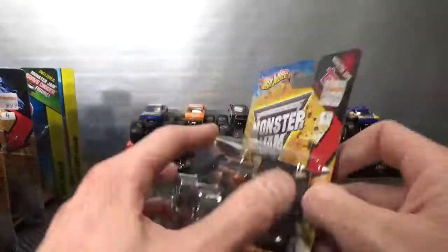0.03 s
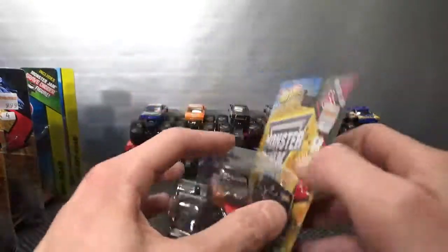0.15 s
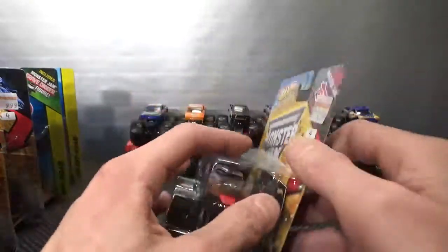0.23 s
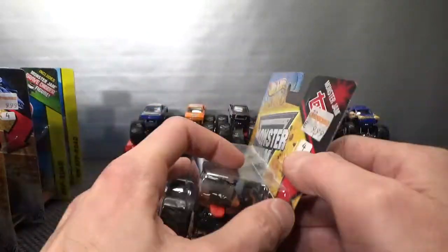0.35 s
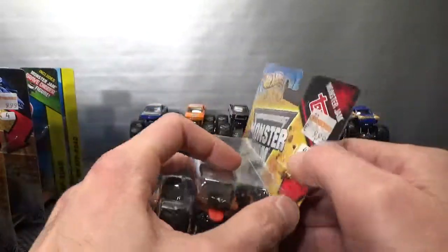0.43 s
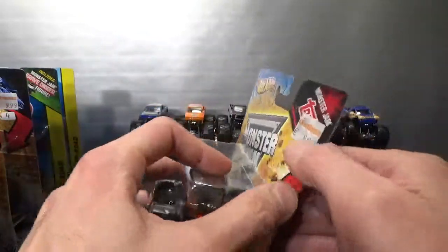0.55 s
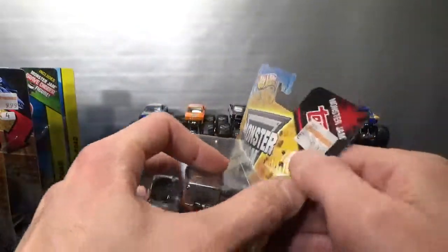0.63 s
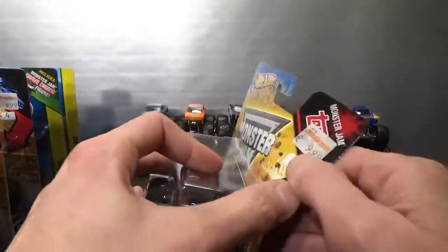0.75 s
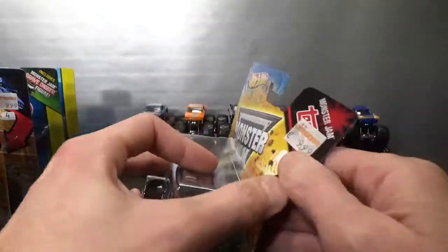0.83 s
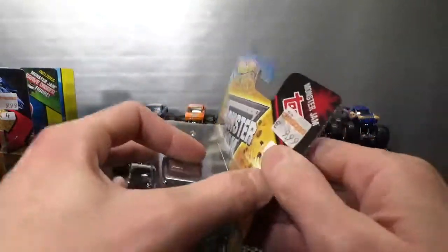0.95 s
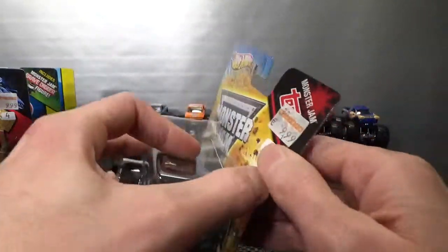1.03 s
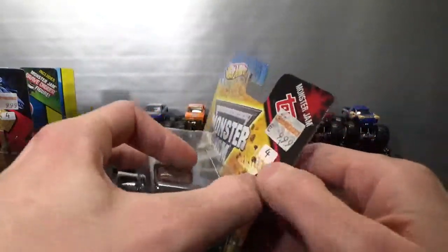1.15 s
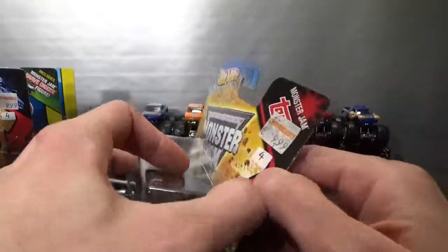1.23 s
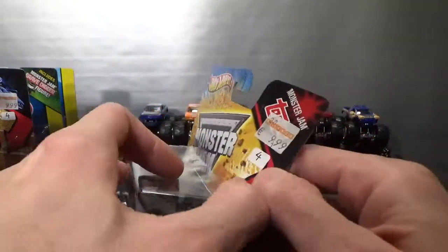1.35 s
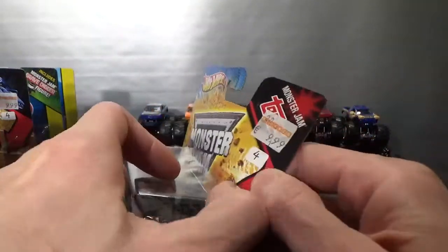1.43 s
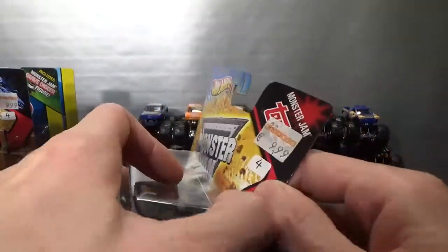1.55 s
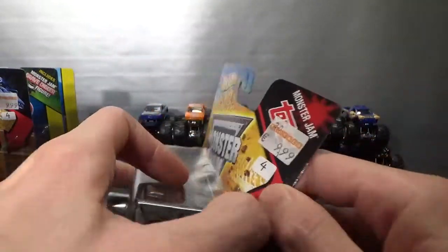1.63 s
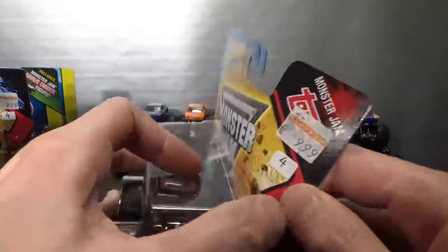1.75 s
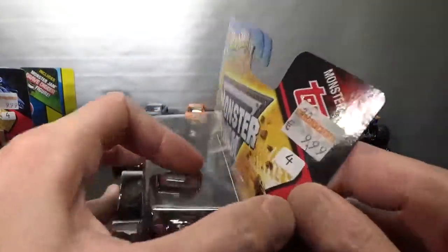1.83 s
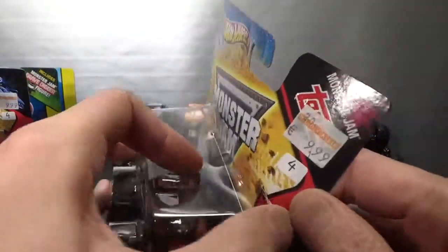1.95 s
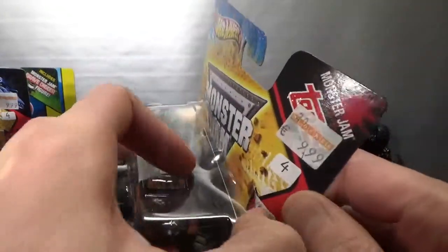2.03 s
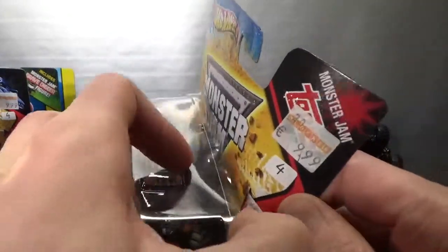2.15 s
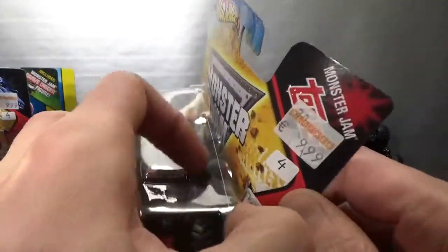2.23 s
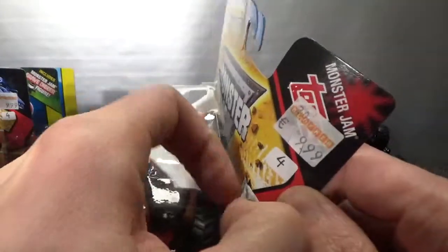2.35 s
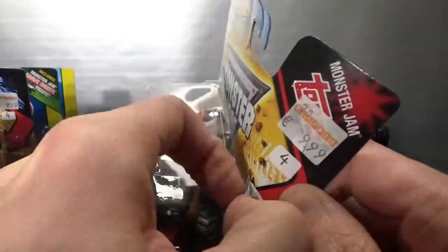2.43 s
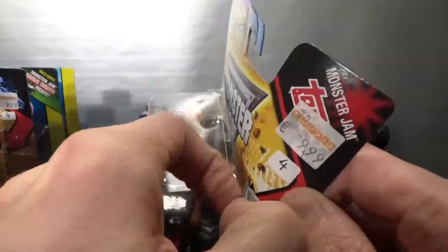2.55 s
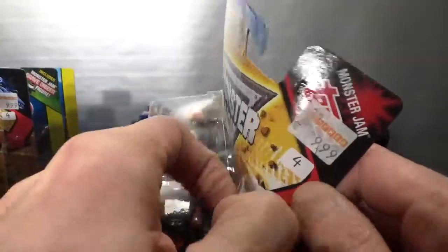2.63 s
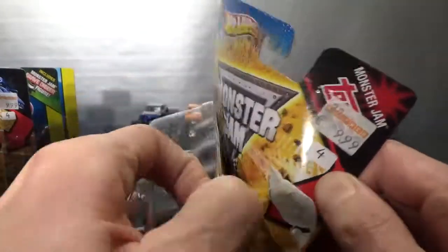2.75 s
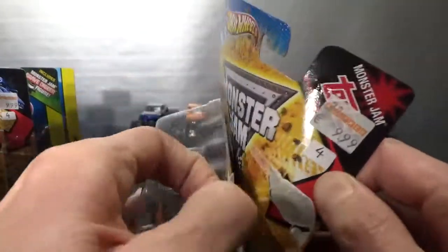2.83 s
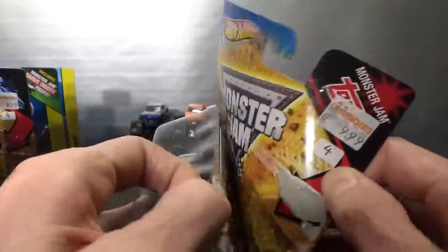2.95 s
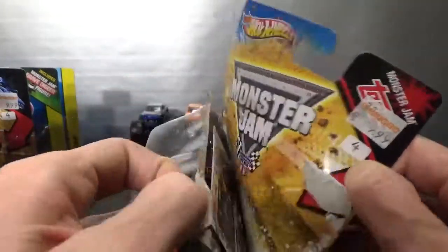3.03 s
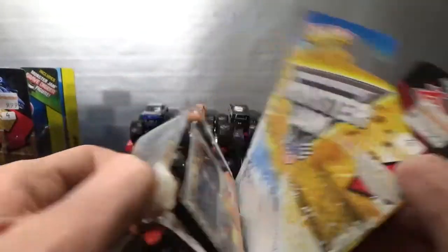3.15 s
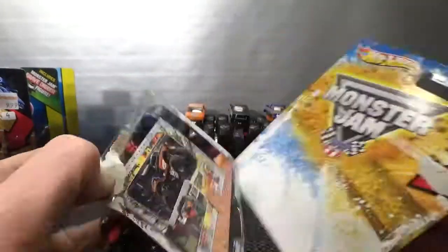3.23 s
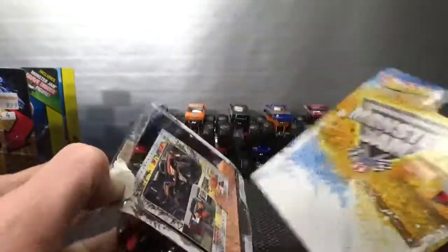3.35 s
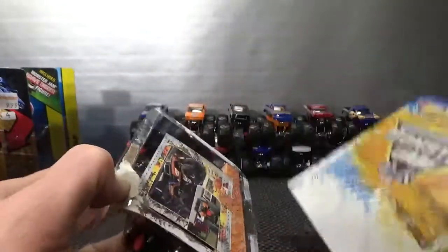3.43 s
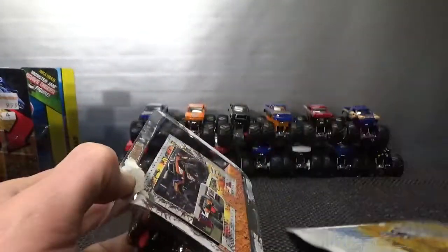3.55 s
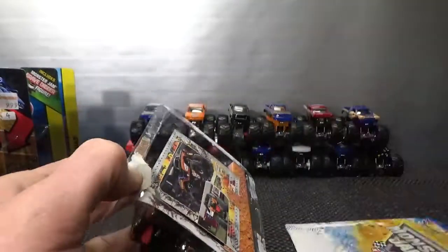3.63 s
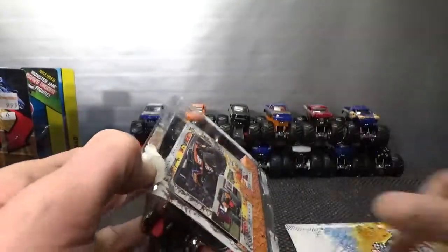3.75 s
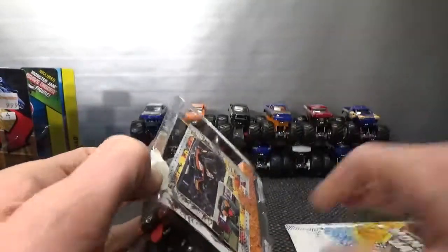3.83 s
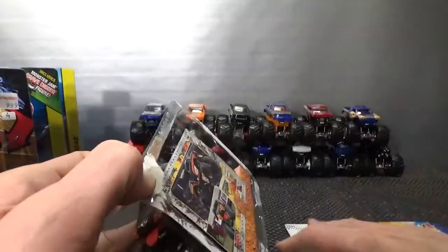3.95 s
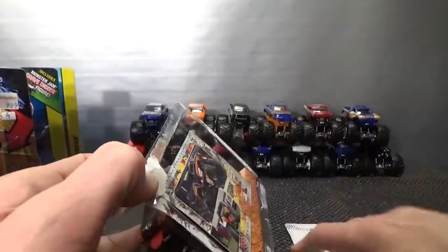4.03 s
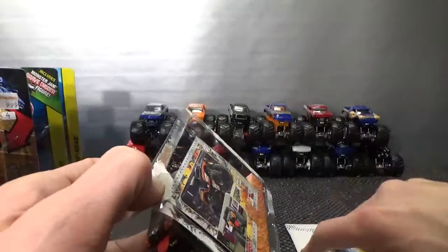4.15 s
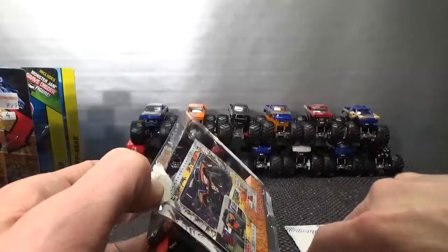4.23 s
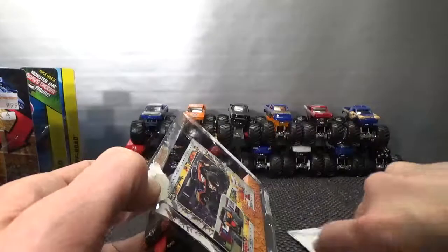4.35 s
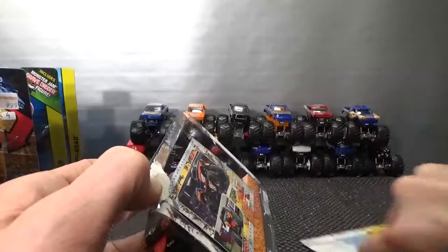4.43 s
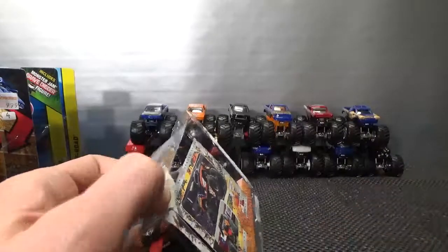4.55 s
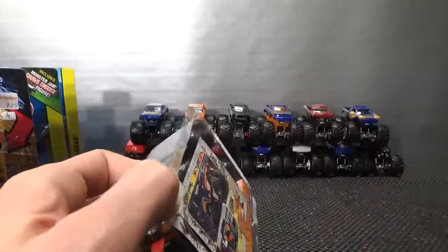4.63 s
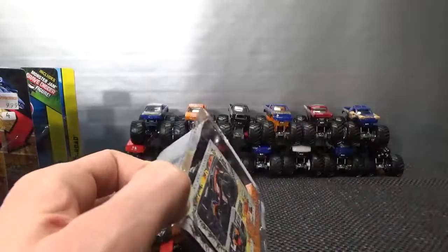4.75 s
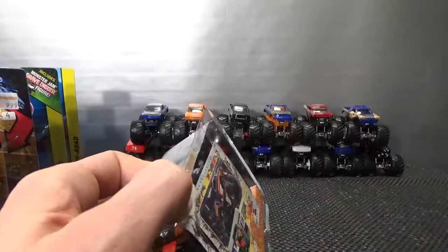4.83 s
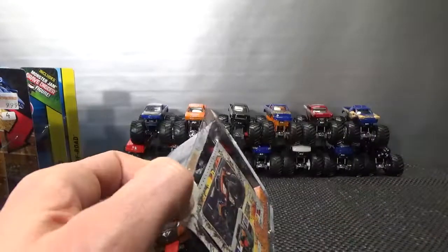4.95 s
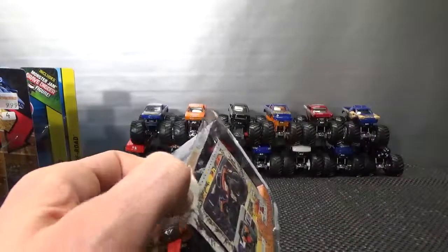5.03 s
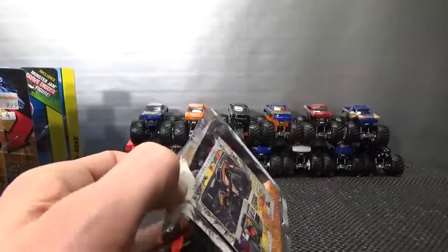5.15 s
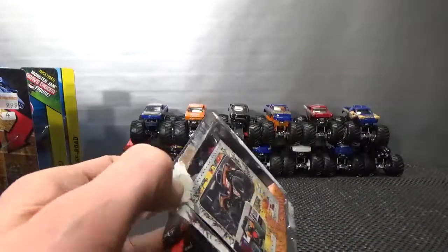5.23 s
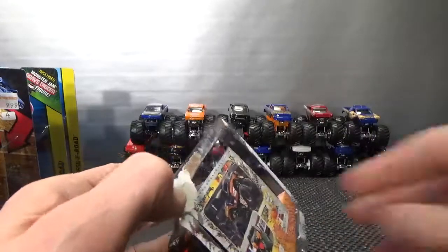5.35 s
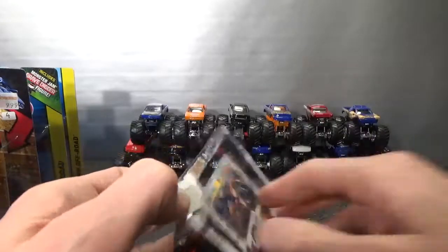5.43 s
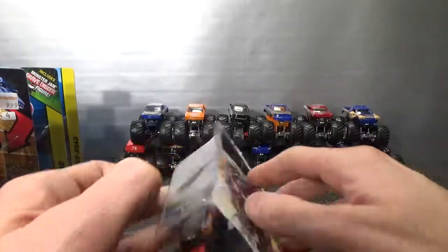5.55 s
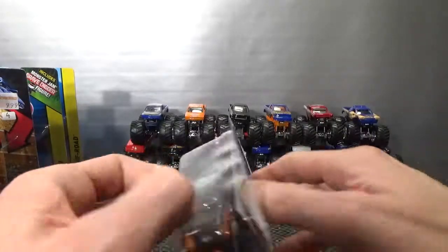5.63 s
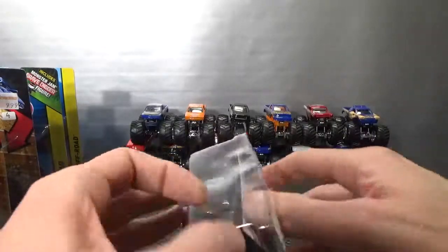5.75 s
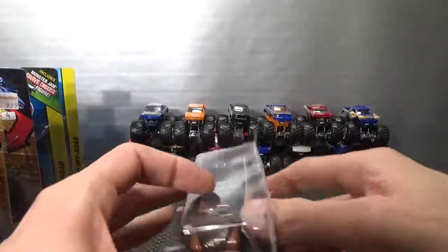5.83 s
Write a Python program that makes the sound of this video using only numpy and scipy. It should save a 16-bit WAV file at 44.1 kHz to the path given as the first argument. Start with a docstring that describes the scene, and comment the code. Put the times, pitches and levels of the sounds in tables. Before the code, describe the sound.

Stiff plastic packaging crackles and snaps, its glue unzips and card tears away, then the card slides on a mat before the empty blister pops loudly.

```python
"""At a table in a small room, close to a camera's stereo microphones, hands peel a plastic blister off its card.
The glue slips and snaps as struck modes and noise cracks; card fibres rip as shaped crackle in two long pulls.
The card lands with low thumps and slides over the mat as rough noise with a hum; the freed blister buckles as
resonant noise. A diffuse tail is the room, steady noise its background, and a limiter holds down the peaks."""
import sys
import numpy as np
from scipy import signal
from scipy.fft import rfft, irfft, next_fast_len
from scipy.io import wavfile
from scipy.ndimage import uniform_filter1d, minimum_filter1d, map_coordinates

SR = 44100
rng = np.random.default_rng(int(sys.argv[2]) if len(sys.argv) > 2 else 0)


def generate_wav(signal):
    """Clip the signal to [-1, 1] and save it as 16-bit WAV at the path in sys.argv[1]."""
    frames = np.transpose(np.atleast_2d(signal))
    scaled = np.clip(frames, -1, 1) * 32767
    pcm = np.round(scaled).astype(np.int16)
    wavfile.write(sys.argv[1], SR, pcm)


N = 260190  # length in samples, 5.9 s
ONSET_DELAY_S = 0.0008  # each slip or snap sounds this long after its listed time


def amp(db):
    """Decibels to gain."""
    return 10 ** (np.asarray(db) / 20)


def unit(x):
    """Scaled to rms 1."""
    return x / np.sqrt(np.mean(x ** 2) + 1e-20)


def strike(x):
    """Scaled to the energy of one millisecond at level 1."""
    return x / np.sqrt(np.sum(x ** 2) * 1000 / SR)


def along(points, hz):
    """Value at hz between (Hz, value) points on a log frequency axis."""
    f, v = np.transpose(points)
    return np.interp(np.log(hz + 1), np.log(f + 1), v)


def gains(rows):
    """One gain per sample for each dB column, all but silent outside the rows."""
    s, *columns = np.transpose(rows)
    t = np.arange(N) / SR
    return [amp(np.interp(t, s, db, left=-120, right=-120)) for db in columns]


def wobble(rate):
    """A smooth random curve, rate knots a second."""
    knots = rng.standard_normal(int(N * rate / SR) + 4)
    return map_coordinates(knots, [np.arange(N) * rate / SR])


def filtered(x, response):
    """x with its spectrum multiplied by a response of frequency in Hz."""
    m = next_fast_len(N + SR // 2)
    return irfft(rfft(x, m) * response(np.fft.rfftfreq(m, 1 / SR)), m)[..., :N]


def band(x, lo_hz, hi_hz):
    """Causal band-pass."""
    edges = [lo_hz, min(hi_hz, SR * .45)]
    return signal.sosfilt(signal.butter(2, edges, 'band', fs=SR, output='sos'), x)


def add(track, s, sound):
    """Lay a sound into a track at a time in seconds, cut at the track's end."""
    part = track[round(s * SR):][:len(sound)]
    part += sound[:len(part)]


def background():
    """Still room air and microphone hiss: noise shared by both microphones plus some of each one's own."""
    # Each row: frequency in Hz, relative level in dB.
    air = [(25, -5), (60, 1.5), (200, -2), (500, -11.5), (1200, -15), (4000, -15), (10000, -16.5)]
    noise = rng.standard_normal(N) + 0.48 * rng.standard_normal((2, N))
    return amp(-53.5) * unit(filtered(noise, lambda hz: amp(along(air, hz))))


def crackle(rate, spread_db, hiss, life, colour_db):
    """Tiny fractures, rate a second, on a soft hiss: noise bursts of random size and colour at an even rms near 1."""
    sizes = amp(spread_db * np.clip(rng.standard_normal(N), -2, 2))
    power = (rng.random(N) < rate / SR) * sizes ** 2
    # life is the time in seconds in which a burst's power falls to 1/e
    power = signal.lfilter([1], [1, -np.exp(-1 / (life * SR))], power)
    x = np.sqrt(power / power.mean() + hiss ** 2) * rng.standard_normal(N)
    # Colour: smooth random patches over frequency and time
    z = signal.stft(x, nperseg=128)[2]
    patches = uniform_filter1d(rng.standard_normal(z.shape), size=4, axis=0)
    patches = uniform_filter1d(patches, size=4, axis=1)
    x = signal.istft(z * amp(colour_db * unit(patches)), nperseg=128)[1][:N]
    return x / np.sqrt(np.abs(uniform_filter1d(x * x, size=1500)) + 1e-6)


def radiate(drive, spectrum, levels):
    """Friction or fracture sounds through card and plastic; low, middle and high parts follow their own gains."""
    # Three parts that meet at their edges. Each row: lower edge in Hz, upper edge in Hz.
    ranges = [(125, 1200), (1200, 6000), (6000, 12000)]

    def share(hz, lo, hi):
        return (hz / lo) ** 4 / np.sqrt((1 + (hz / lo) ** 8) * (1 + (hz / hi) ** 8))

    parts = [unit(filtered(drive, lambda hz: amp(along(spectrum, hz)) * share(hz, lo, hi)))
             for lo, hi in ranges]
    return np.sum(levels * parts, axis=0)


def effort(curves, wall_db):
    """Low, middle and high gains from the hands' strength; brightness tips them about the middle."""
    t, levels = np.arange(N) / SR, np.zeros((3, N))
    for rows in curves:
        s, db, bright_db = np.transpose(rows)
        tilt = np.interp(t, s, bright_db)
        active = (t >= s[0]) * (t <= s[-1])
        balance = np.array([-tilt, np.full(N, wall_db), tilt])
        levels += active * amp(np.interp(t, s, db) + balance)
    return levels


def burst(t, lo_hz, hi_hz, t60):
    """Many close modes, as band-passed noise, swelling quickly and dying together."""
    envelope = amp(-60 * t / t60) * (1 - np.exp(-t / 0.00024))
    return strike(band(rng.standard_normal(len(t)) * envelope, lo_hz, hi_hz))


def crack(t, lo_hz, hi_hz, t60):
    """A fracture: one clean click, then a burst of splinters."""
    click = strike(band(signal.unit_impulse(len(t), 18), lo_hz, hi_hz))
    return strike(0.76 * click + burst(t, lo_hz, hi_hz, t60))


def crease(wall_db, shell_db, edge_db, hz):
    """A crease cracks at its edge, rings the wall around its own pitch and nudges the shell and its card."""
    t = np.arange(SR // 16) / SR
    wall = burst(t, hz * .8, hz * 1.22, t60=.011) + .8 * crack(t, 1200, 5500, t60=.011)
    edge = crack(t, 6000, 12500, t60=.009)
    card = burst(t, 177, 393, t60=0.035)
    shell = burst(t, 550, 982, t60=0.04) + amp(-6.5) * card
    return amp(wall_db) * strike(wall) + amp(edge_db) * edge + amp(shell_db) * shell


def crinkles(levels, count, over_db, spread_db):
    """Small creases give way at random while the plastic is strained, the louder the harder the hands work."""
    middle_hz, spread_octaves = 2920, 0.34
    out, strained = np.zeros(N), np.flatnonzero(levels[1])
    # One random moment in each of count equal slices of the strained time
    places = (np.arange(count) + rng.random(count)) / count
    moments = strained[(places * len(strained)).astype(int)]
    draws = np.clip(rng.standard_normal((count, 2)), -2, 2)
    for i, (size, pitch) in zip(moments, draws):
        shell_db, wall_db, edge_db = 20 * np.log10(levels[:, i]) + over_db + spread_db * size
        hz = middle_hz * 2 ** (spread_octaves * pitch)
        add(out, i / SR, crease(wall_db, shell_db, edge_db, hz))
    return out


def handling():
    """Fingers rub as soft crackle coloured by the pack, and the stressed plastic ticks as small creases."""
    # Fingers work the pack in separate stretches. Each row: time in seconds, strength in dB, brightness in dB.
    stretches = [
        [(0.0, -51, -4), (0.18, -39, -3.5), (0.32, -48.5, -8.5), (0.5, -46, -5.5), (0.95, -45, -0.5),
         (1.15, -57, -12.5), (1.33, -36.5, -0.5), (1.52, -50, 4), (1.93, -54, -2.5), (2.2, -50, 0),
         (2.55, -47, -0.5)],
        [(3.34, -55, 1), (3.49, -59, 9), (3.56, -50.5, 7), (3.68, -58, 0), (3.95, -64, 1)],
        [(5.275, -39.5, -4), (5.4, -43, 1.5), (5.5, -30, -5), (5.66, -45, -3), (5.78, -48.5, 2),
         (5.9, -20, 3.5)],
    ]
    # The pack's colour. Each row: frequency in Hz, relative level in dB.
    pack_colour = [(59, -9), (100, 2.5), (160, -9.5), (199, 5), (482, -3), (623, 3), (853, 3.5),
                   (1020, -18.5), (1240, -0.5), (2830, -7), (3520, -7), (6340, -25), (9220, -17),
                   (11000, -29), (14300, -99), (22000, -120)]
    grip = effort(stretches, wall_db=-5)
    ticks = crackle(rate=220, spread_db=7.5, hiss=.6, life=.001, colour_db=2.5)
    return radiate(ticks, pack_colour, grip) + crinkles(grip, count=110, over_db=6, spread_db=5)


def ring(modes, t, scatter_db, detune):
    """Damped modes summed to peak 1; their levels and pitches scatter a little at each strike."""
    x = np.zeros(len(t))
    for k, (hz, db, t60) in enumerate(modes):
        decay = amp(db + scatter_db * rng.normal() - 60 * t / t60)
        pitch = hz * np.exp(detune * rng.normal())
        x += (-1) ** k * decay * np.sin(2 * np.pi * pitch * t)
    return x / np.abs(x).max()


def thumps():
    """Card and hand land through the mat: a low push, the table top's ring and a dull noise tap."""
    # Each row: start in seconds, level of push and ring in dB, pitch of the push in Hz, level of the tap in dB.
    landings = [(0.105, -39, 75, -53), (3.512, -32.5, 84, -28.5), (3.658, -35, 117, -32.5),
                (3.96, -34.5, 74, -52), (4.049, -40.5, 68.4, -46), (4.205, -31.5, 150, -25.5),
                (4.35, -41, 80, -22.5)]
    # Table top modes. Each row: frequency in Hz, relative level in dB, decay by 60 dB in seconds.
    top_modes = [(106.5, -7, 0.14), (155.4, -6.5, 0.35), (195, -14, 0.33), (312.3, -14.5, 0.33)]
    out, t = np.zeros(N), np.arange(SR // 3) / SR
    for s, db, hz, tap_db in landings:
        low = ring([(hz, 0, .05), (hz * .7, -3, .08)], t, scatter_db=1.5, detune=.02)
        top = ring(top_modes, t, scatter_db=3.0, detune=0.013)
        tap = burst(t, 120, 1100, t60=0.035)
        add(out, s, amp(db) * (low + amp(-0.5) * top) + amp(tap_db) * tap)
    return out


def tearing():
    """Card fibres break as dense crackle: short bright runs, then long coarse rips that crinkle the plastic."""
    # Short runs. Each row: start in seconds, length in seconds, level in dB.
    short_runs = [(0.162, 0.048, -43), (0.722, 0.047, -39.5), (1.378, 0.076, -24), (1.998, 0.0092, -30.5),
                  (2.009, 0.021, -29), (2.062, 0.046, -30.5), (2.202, 0.18, -36.5), (5.833, 0.04, -36)]
    # The two long pulls. Each row: time in seconds, strength in dB, brightness in dB.
    long_pulls = [
        [(2.575, -40, 0), (2.615, -33, 11), (2.70, -28.5, 4.5), (2.77, -28, 4), (2.80, -33.5, -1.5),
         (2.83, -41, -17), (2.92, -63, -9)],
        [(2.93, -70, 7), (2.96, -28.5, 3.5), (3.01, -28.5, -3.5), (3.075, -34.5, 0.5), (3.11, -31, 9.5),
         (3.18, -24.5, -1.5), (3.29, -38, 0.5), (3.35, -47, -2)],
    ]
    # Colour of the tearing fibres. Each row: frequency in Hz, relative level in dB.
    fibre_colour = [(59, -27), (100, -5.5), (238, -4), (267, -3), (345, -0.5), (522, -21), (715, 0.5),
                    (1040, -24.5), (1260, -11.5), (1570, -19), (4200, -17.5), (5640, -23), (9400, -11.5),
                    (11000, -18.5), (14300, -57), (22000, -120)]
    runs, pull = np.zeros(N), effort(long_pulls, wall_db=2)
    for s, length, db in short_runs:
        add(runs, s, amp(db) * np.sqrt(signal.windows.tukey(round(length * SR), .5)))
    fine = crackle(rate=900, spread_db=4, hiss=.3, life=.0004, colour_db=2)
    coarse = crackle(rate=600, spread_db=4.5, hiss=.45, life=.0007, colour_db=3)
    bright = runs * unit(band(fine, 8350, 10500))
    rips = amp(-1.5) * radiate(coarse, fibre_colour, pull)
    return bright + rips + crinkles(pull, count=48, over_db=3, spread_db=5.5)


def snaps():
    """The big creases give way one by one, each cracking its edge and ringing wall and shell."""
    # Each row: start in seconds, relative levels of wall, shell and edge in dB, pitch of the wall in Hz.
    creases = [(0.1745, -20, -25, -28, 3380), (0.1884, -27, -22, -35, 2550),
               (0.2813, -29, -15.5, -39, 1640), (0.3119, -19.5, -23.5, -32, 1500),
               (0.3184, -22.5, -21, -32.5, 1560), (0.3805, -20, -23.5, -23.5, 1750),
               (0.4524, -27, -29.5, -33.5, 1990), (0.5157, -25.5, -29.5, -34.5, 3700),
               (0.624, -17.5, -21, -31, 3820), (0.6744, -23, -28, -34, 1660), (0.8155, -9, -45, -26, 4470),
               (0.8545, -11, -30, -34, 3760), (1.4178, -21, -50, -16, 5450), (1.4381, -21, -32, -24, 3010),
               (1.5813, -26.5, -34, -37, 3420), (1.6586, -11, -59, -22, 3750),
               (1.6864, -42, -41, -24.5, 4230), (1.7699, -27.5, -40, -31, 3500),
               (1.7784, -35, -37.5, -23, 3940), (2.0158, -40, -63, -37, 3670),
               (2.0667, -29, -32, -30, 4860), (2.0745, -24, -41, -40, 1560), (2.1011, -17, -30, -32, 3300),
               (2.1256, -38, -51, -25.5, 5280), (2.153, -29, -31.5, -26.5, 4010),
               (2.2142, -32, -26, -40, 1970), (2.2248, -15.5, -34, -30, 2240),
               (2.2538, -15, -20.5, -20, 1550), (2.2792, -12, -44, -28, 4000),
               (2.3144, -35, -52, -23, 5250), (2.3241, -11, -20, -19.5, 1460),
               (2.366, -26, -30.5, -29, 2420), (2.4245, -12.5, -20, -18, 3670),
               (2.5107, -9.5, -20, -15.5, 1610), (2.5431, -11.5, -18, -16, 2750),
               (2.5706, -18, -25, -18, 1900), (2.5845, -12, -49, -21, 4160),
               (2.6204, -12.5, -28.5, -19, 2930), (2.6614, -13, -36, -20, 3030),
               (2.6868, -9, -26, -9, 3180), (2.7774, -19, -17.5, -14, 3700), (2.833, -12, -18, -26, 1490),
               (2.9657, -5.5, -17, -10, 3120), (2.9941, -16, -17, -15, 3070), (3.0532, -12, -26, -22, 2400),
               (3.0784, -5.5, -14.5, -8, 4000), (3.1118, -15, -34, -16, 4080), (3.1223, -7, -17, -17, 4380),
               (3.1722, -13, -19.5, -19, 2700), (3.1964, -15, -18.5, -29, 1730),
               (3.2534, -16, -48, -12, 3220), (3.2664, -13.5, -32, -19, 4160), (3.2715, 0, -16, -37, 2400),
               (3.3538, -20.5, -41, -30.5, 3690), (3.3648, -19, -45, -38, 4400),
               (3.4181, -27, -49, -31, 3570), (4.361, -23.5, -28, -32, 1510), (4.4094, -28, -32, -35, 2100),
               (4.8973, -20, -21, -44, 2470), (5.019, -7, -39, -16, 4300), (5.1123, -5.5, -29, -0.5, 5200),
               (5.2704, -22.5, -31, -53, 2850), (5.4385, -6.5, -16, -15, 2380), (5.462, -3, -12, -13, 4000),
               (5.4964, -9, -20, -15, 2530), (5.6765, -13, -24, -19.5, 1390), (5.7473, -20, -37, -25, 1670),
               (5.8052, -24, -31, -29, 1820), (5.8242, -16, -33, -9, 3700)]
    wall_gain_db, shell_gain_db, edge_gain_db = -3, 5.5, 3.5  # how strongly each part answers
    out = np.zeros(N)
    for s, wall_db, shell_db, edge_db, hz in creases:
        sound = crease(wall_db + wall_gain_db, shell_db + shell_gain_db, edge_db + edge_gain_db, hz)
        add(out, s + ONSET_DELAY_S, sound)
    return out


def flexes():
    """A broad panel of the pack flips over: a few heavily damped swings with weaker overtones."""
    # Each row: start in seconds, relative level in dB, pitch in Hz.
    flips = [(0.262, -26.5, 310), (0.282, -17, 645), (0.286, -25, 570), (0.311, -21, 594),
             (0.358, -18.5, 640), (0.375, -18.5, 677), (1.775, -32, 554), (2.071, -27.5, 240),
             (2.448, -16, 678), (2.514, -23.5, 325), (2.778, -16.5, 315), (2.812, -11.5, 206),
             (2.816, -21, 523), (2.833, -20.5, 249), (3.011, -16.5, 700), (3.131, -15, 820),
             (3.177, -12.5, 863), (5.405, -5, 478), (5.469, -11.5, 827)]
    out, t = np.zeros(N), np.arange(SR // 8) / SR
    for s, db, hz in flips:
        modes = [(hz, 0, .03), (hz * 1.368, -9, .025), (hz * 2.145, -9, .018)]  # Hz, dB, t60 in s
        swing = ring(modes, t, scatter_db=2.0, detune=0.0046)
        add(out, s, amp(db + 11.5) * swing * (1 - np.exp(-t / 0.0036)))
    return band(out, 160, 9900)


def chatter(count):
    """Time and dB of the small slips that unzip the seam: the gaps shrink steadily while the level glides."""
    # Each row: start in seconds, end in seconds, first gap in seconds, ratio of each gap to the one before,
    # first level in dB, last level in dB.
    unzips = [(0.8797, 0.981, 0.0092, 0.92, -27.5, -11), (1.2875, 1.371, 0.013, 0.9, -10.5, -19.5)]
    rows = []
    for start, end, gap, shrink, first_db, last_db in unzips:
        times = start + np.append(0, np.cumsum(gap * shrink ** np.arange(count)))
        rows += [(s, np.interp(s, [start, end], [first_db, last_db])) for s in times if s < end]
    return rows


def slips():
    """The glue seam sticks, then slips: each slip cracks and plucks the same walls and shell."""
    # Loud slips. Each row: start in seconds, relative level in dB.
    loud_slips = [(0.9951, -13.5), (1.0085, -9.5), (1.0232, -8), (1.072, -7), (1.0914, -8.5), (1.1087, -8),
                  (1.1276, -10), (1.1404, -7.5), (1.145, -12), (1.1832, -5), (1.2164, -6), (1.2387, -5.5),
                  (1.2551, -8), (1.271, -3), (1.2784, -7)]
    # Wall modes at the seam. Each row: frequency in Hz, relative level in dB, decay by 60 dB in seconds.
    seam_modes = [(1300, -5.5, 0.014), (1950, -7.5, 0.022), (2490, -4.5, 0.02), (3750, 2.5, 0.011),
                  (5700, -1, 0.0048), (7420, -4, 0.013), (8500, -9, 0.015), (9270, -13, 0.015)]
    # Modes of the glued blister. Each row: frequency in Hz, relative level in dB, decay by 60 dB in seconds.
    shell_modes = [(253, -25, 0.11), (647, 1, 0.018), (780, 3.5, 0.011), (930, -5.5, 0.014)]
    wall_gain_db, shell_gain_db = -7, -11
    shell_follows = 0.51  # the shell's dB per dB of slip
    out, t = np.zeros(N), np.arange(SR // 16) / SR
    for s, db in list(loud_slips) + chatter(count=13):
        wall = strike(ring(seam_modes, t, scatter_db=0.5, detune=0.029))
        glue = crack(t, 1500, 12500, t60=.006)
        shell = strike(ring(shell_modes, t, scatter_db=0.5, detune=0.055))
        sound = amp(db + wall_gain_db) * strike(wall + 1.04 * glue)
        sound += amp(shell_follows * db + shell_gain_db) * shell
        add(out, s + ONSET_DELAY_S, sound)
    return out


def push(s, length):
    """Gain of one push of the card: it starts softly, gathers speed and stops."""
    attack_s, release_s, swell_db = 0.072, 0.041, 2.5
    t = np.arange(N) / SR - s
    swell = amp(swell_db * (np.clip(t / length, 0, 1) - 1.5))
    return np.clip(t / attack_s, 0, 1) * swell * np.exp(-np.maximum(t - length, 0) / release_s)


def slide():
    """The card scrapes over the weave of the mat, hisses along its edge and briefly judders as a wavering hum."""
    # Pushes of the card. Each row: start in seconds, length in seconds, relative level of the scrape in dB,
    # its bass in dB, its treble in dB, relative level of the edge hiss in dB, pitch of the hiss in Hz.
    strokes = [(4.017, 0.10, -43.5, -7.5, 6.5, -34, 9700), (4.172, 0.17, -35, -13.5, -7.5, -35, 4440),
               (4.421, 0.2, -34.5, -0.5, -1, -46, 8000), (4.633, 0.27, -35.5, 4, 0.5, -41, 7500)]
    # Colour of the mat. Each row: frequency in Hz, relative level in dB.
    mat_colour = [(47, -32), (80, -13), (287, -10), (353, -8.5), (433, -13), (654, -9.5), (710, -10),
                  (891, -12), (1400, -10), (1910, -7.5), (9330, -5.5), (11000, -8.5), (14300, -100),
                  (22000, -120)]
    # Strength of the hum. Each row: time in seconds, level in dB.
    hum_curve = [(4.54, -61), (4.60, -34.5), (4.68, -62), (4.75, -44), (4.83, -21), (4.87, -34.5),
                 (4.92, -41), (4.96, -47)]
    hiss_width = 1.48  # the edge hiss reaches this factor above and below its pitch
    weave = crackle(rate=570, spread_db=4.5, hiss=1.5, life=0.0012, colour_db=2.5)
    levels, hiss = np.zeros((3, N)), np.zeros(N)
    for s, length, db, bass_db, treble_db, hiss_db, hz in strokes:
        speed = push(s, length)
        levels += amp(db) * amp([[bass_db], [0], [treble_db]]) * speed
        edge = unit(band(rng.standard_normal(N), hz / hiss_width, hz * hiss_width))
        hiss += amp(hiss_db) * speed * edge
    hum_hz = 355 * (1 + 0.026 * wobble(70))
    phase = 2 * np.pi * np.cumsum(hum_hz) / SR
    hum = unit(np.sin(phase) + 0.36 * np.sin(2 * phase)) * amp(1.4 * wobble(41))
    return amp(-1.0) * radiate(weave, mat_colour, levels) + hiss + gains(hum_curve)[0] * hum


def buckles():
    """The freed blister pops and shudders: noise through its cavity resonances and a crackling wall rattle."""
    # Each row: start in seconds, level of the boom in dB, level of the rattle in dB, decay by 60 dB in seconds.
    pops = [(5.404, -4.5, -23, 0.14), (5.519, -17, -16, 0.36)]
    # Resonances of the blister. Each row: frequency in Hz, width in Hz, relative level in dB.
    resonances = [(320, 250, 7.5), (448, 76, 17), (630, 72, -9), (840, 40, -5), (1066, 67, 0),
                  (1240, 75, -1.5), (1470, 150, -8)]
    # Colour of the rattling walls. Each row: frequency in Hz, relative level in dB.
    wall_colour = [(200, -25), (700, -7), (1400, -1), (2000, -11.5), (2600, -5), (3100, -10), (4000, -22),
                   (10000, -30.5)]
    boom, shake, t = np.zeros(N), np.zeros(N), np.arange(SR // 2) / SR
    for s, db, rattle_db, t60 in pops:
        shudder = amp(-60 * t / t60) * (1 - np.exp(-t / 0.0031))
        add(boom, s, amp(db) * shudder)
        add(shake, s, amp(rattle_db) * shudder)

    def cavity(f):
        return sum(amp(db) / (1 + ((f - hz) / (width / 2)) ** 2) for hz, width, db in resonances)

    hollow = unit(band(filtered(rng.standard_normal(N), cavity), 210, 9000))
    rattle = crackle(rate=1100, spread_db=4, hiss=1.0, life=0.002, colour_db=2.5)
    rattle = unit(filtered(rattle, lambda f: amp(along(wall_colour, f))))
    return boom * hollow + shake * rattle


def room(x):
    """The small room's diffuse answer: a decaying noise tail, different at each microphone."""
    # Each row: frequency in Hz, decay by 60 dB in seconds.
    decays = [(150, 0.12), (1000, 0.18), (4000, 0.15), (10000, 0.13)]
    hz, t, z = signal.stft(rng.standard_normal((2, SR // 2)), SR, nperseg=256)
    fade = amp(-60 * t / along(decays, hz)[:, None])
    tail = signal.istft(z * fade, SR, nperseg=256)[1]
    delayed = np.pad(x, (180, 0))[None]  # the answer starts 4 ms late
    return signal.fftconvolve(delayed, tail / np.linalg.norm(tail[0]), axes=1)[:, :N]


def scene():
    """The pack is just right of centre, the table sounds further to the right; room and background join."""
    pack = slips() + snaps() + flexes() + buckles() + tearing() + handling()
    table = slide() + thumps()
    # The pack's lean: (Hz, dB taken from the left and given to the right)
    lean = [(60, .3), (200, 0.28), (1000, 0.66), (6000, 0.2)]
    direct = filtered(pack, lambda hz: amp(along(lean, hz) * [[-1], [1]]))
    direct = direct + table * amp([[-1.2], [1.1]])
    return direct + amp(-10.5) * room(pack) + amp(-9.0) * room(table) + background()


def limiter(x, ceiling, release_db):
    """The gain drops just ahead of each peak and recovers by release_db a second."""
    over_db = 20 * np.log10(np.maximum(np.abs(x).max(axis=0) / ceiling, 1))
    ramp = release_db * np.arange(N) / SR
    cut_db = np.maximum.accumulate(over_db + ramp) - ramp
    return x * uniform_filter1d(minimum_filter1d(amp(-cut_db), size=45), size=45)


def record(dry):
    """The recorder's fast limiter, then a steep low-pass at its band limit."""
    top_hz = 11100
    held = limiter(dry, ceiling=0.51, release_db=450)
    return filtered(held, lambda hz: 1 / np.sqrt(1 + (hz / top_hz) ** 170))


dry = scene()
out = record(dry)
generate_wav(out)
```